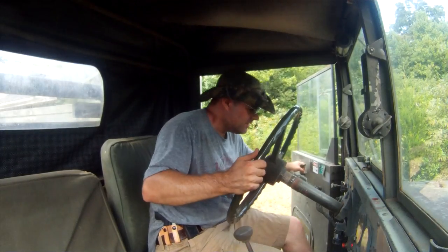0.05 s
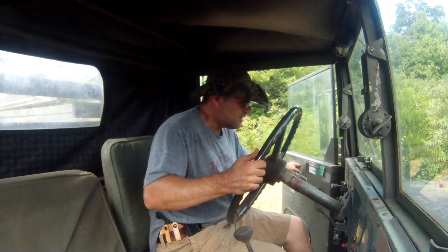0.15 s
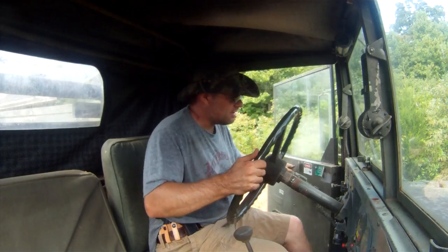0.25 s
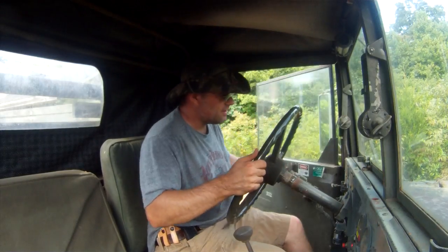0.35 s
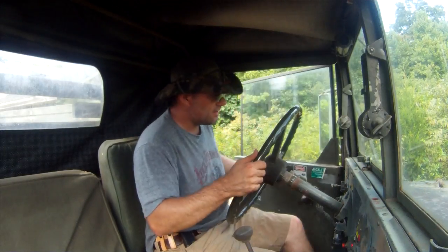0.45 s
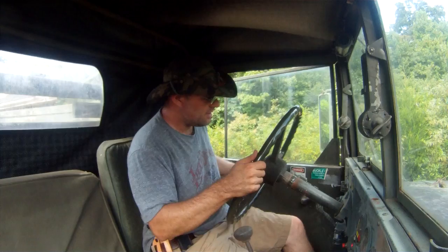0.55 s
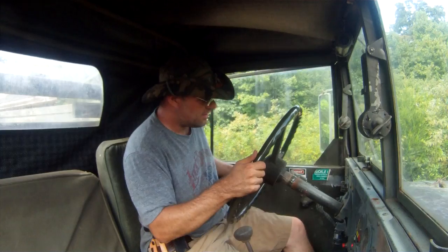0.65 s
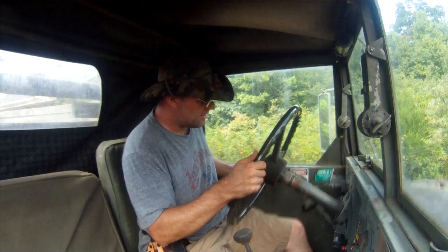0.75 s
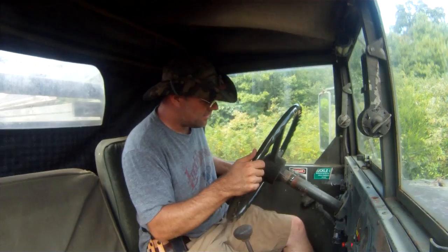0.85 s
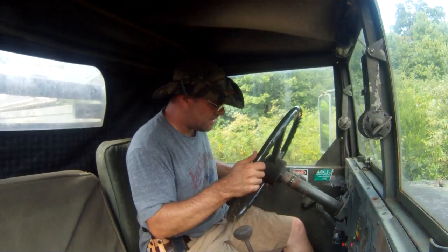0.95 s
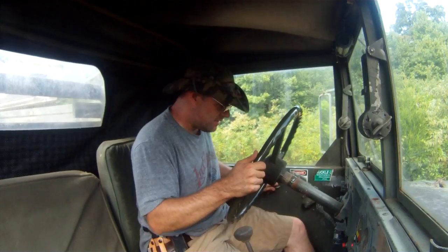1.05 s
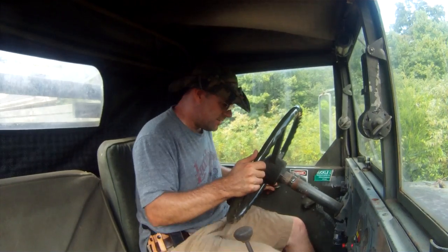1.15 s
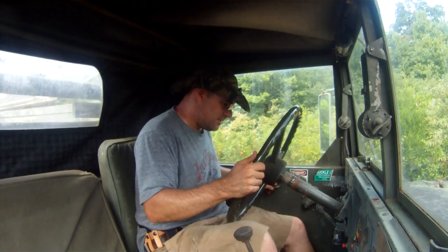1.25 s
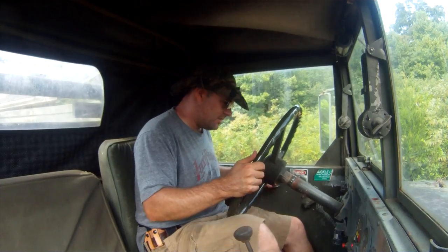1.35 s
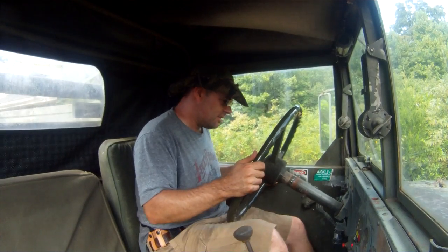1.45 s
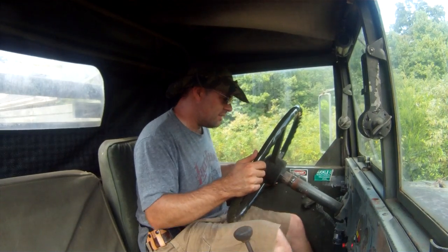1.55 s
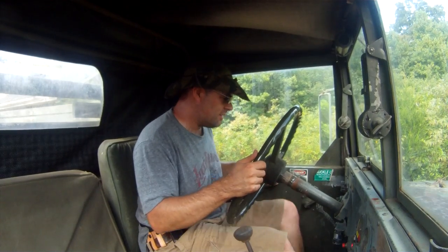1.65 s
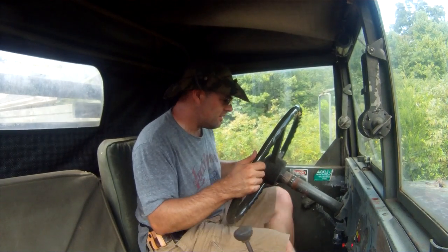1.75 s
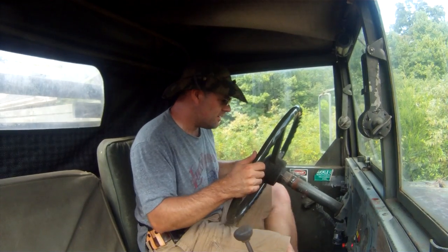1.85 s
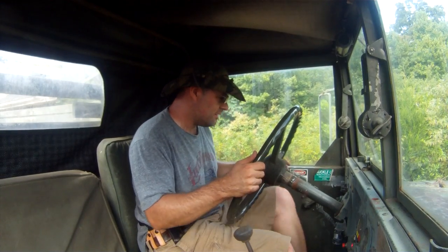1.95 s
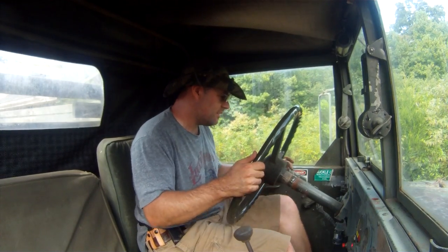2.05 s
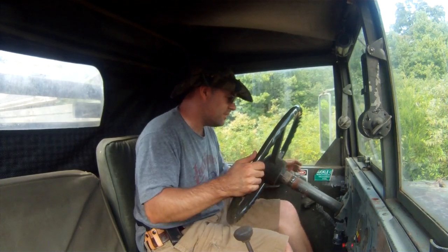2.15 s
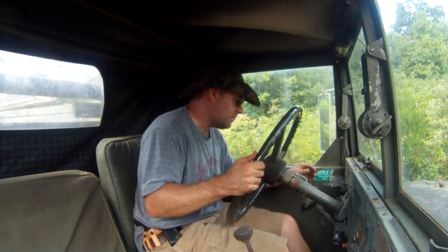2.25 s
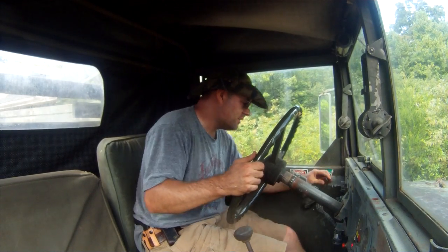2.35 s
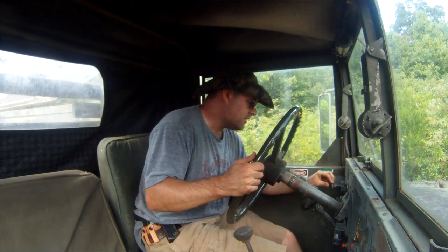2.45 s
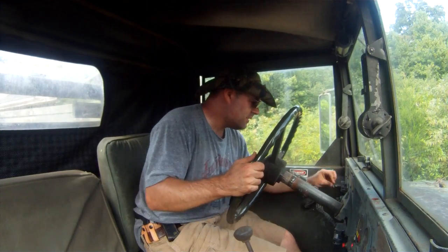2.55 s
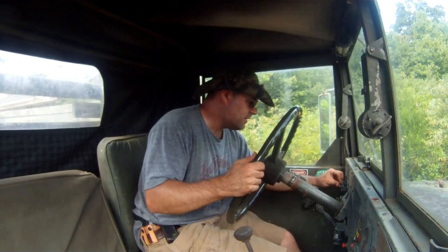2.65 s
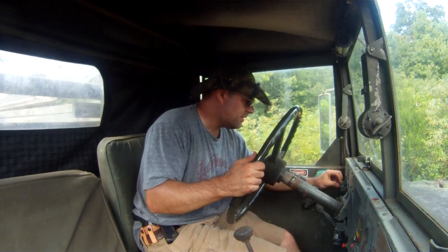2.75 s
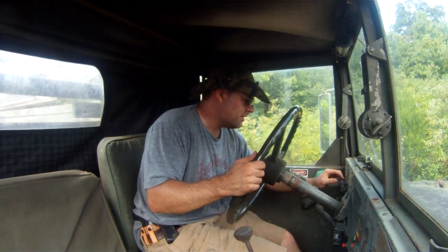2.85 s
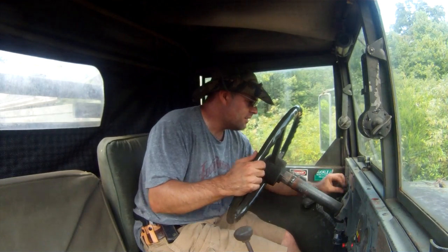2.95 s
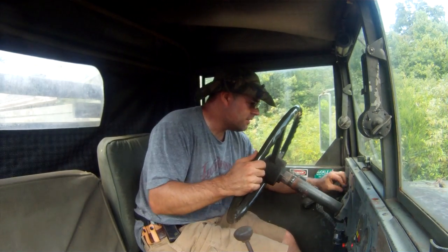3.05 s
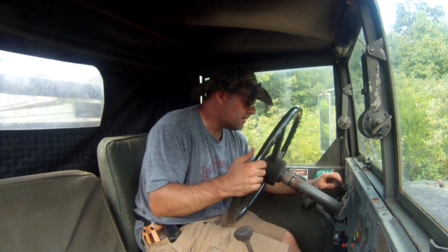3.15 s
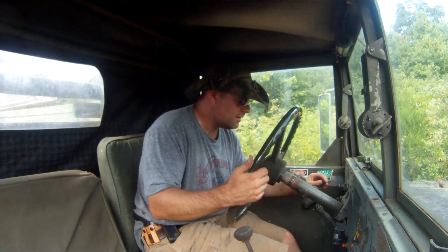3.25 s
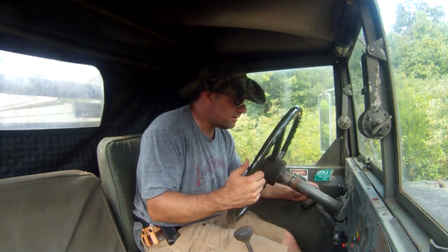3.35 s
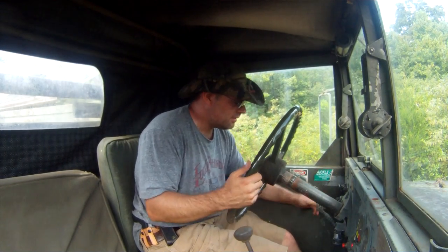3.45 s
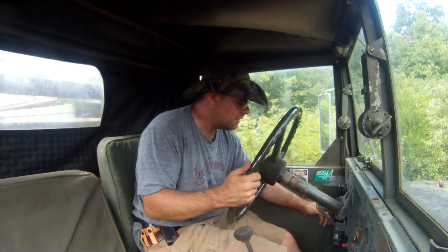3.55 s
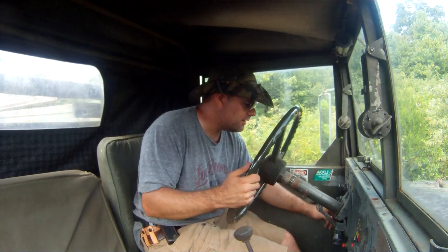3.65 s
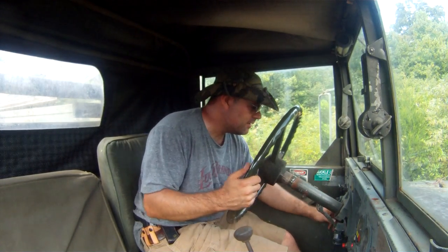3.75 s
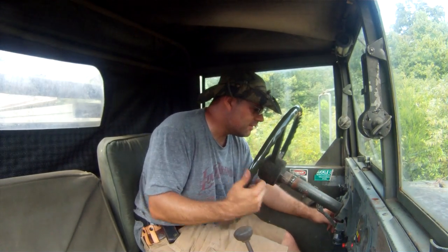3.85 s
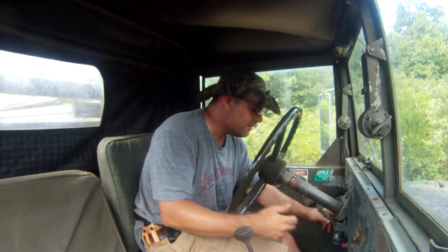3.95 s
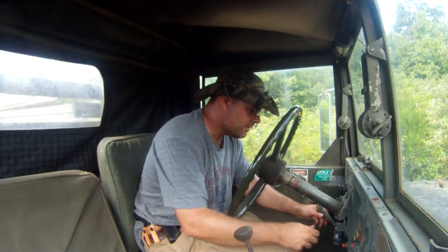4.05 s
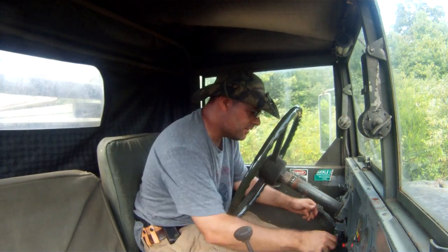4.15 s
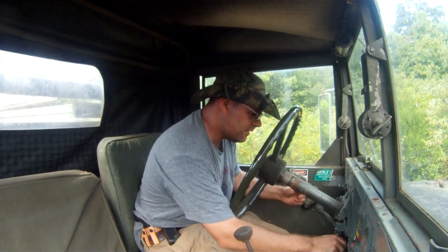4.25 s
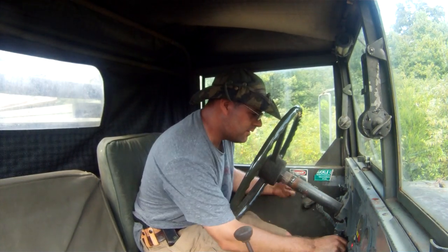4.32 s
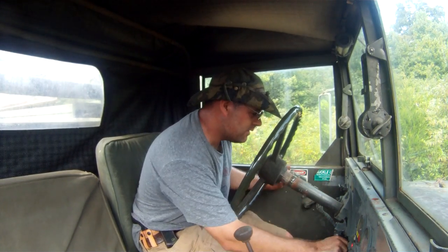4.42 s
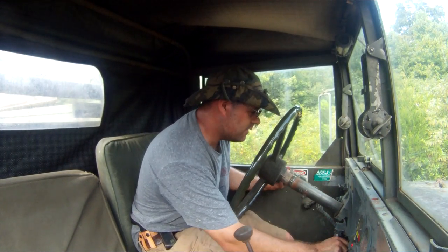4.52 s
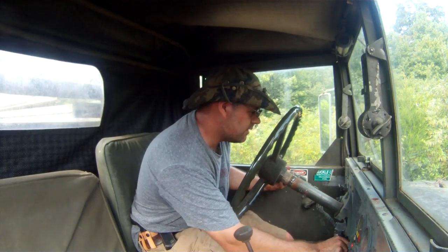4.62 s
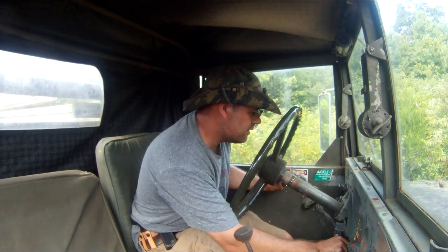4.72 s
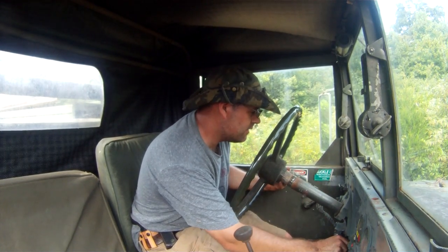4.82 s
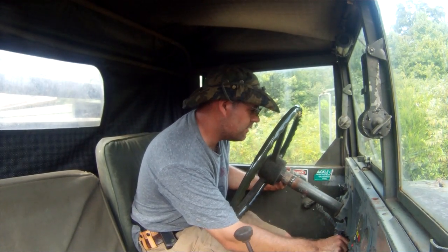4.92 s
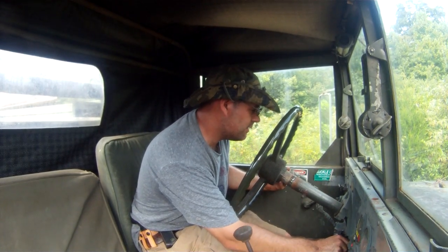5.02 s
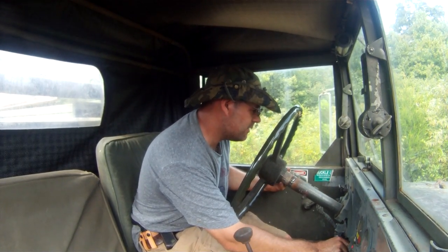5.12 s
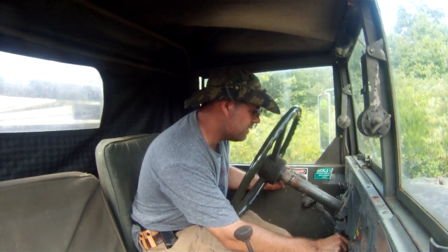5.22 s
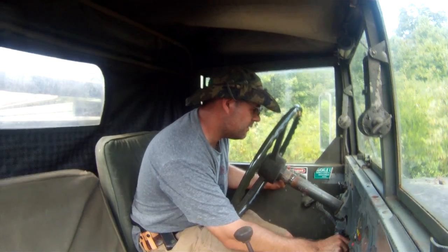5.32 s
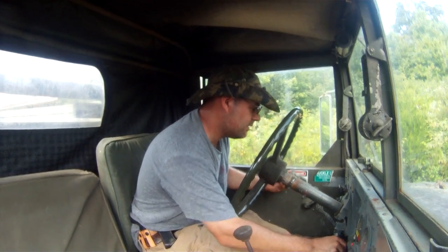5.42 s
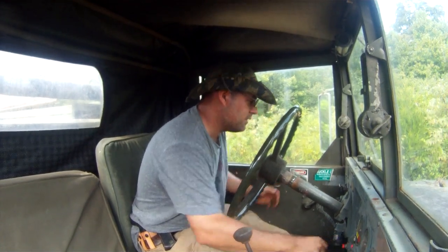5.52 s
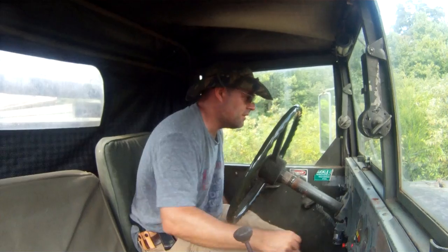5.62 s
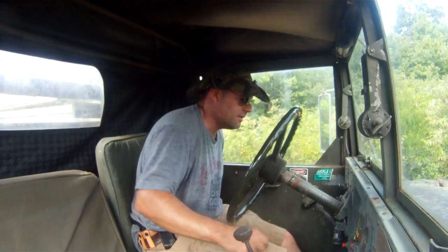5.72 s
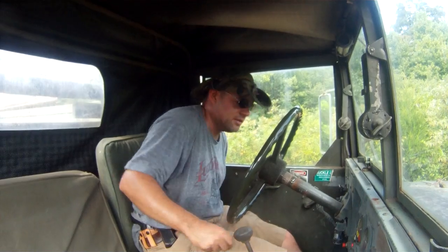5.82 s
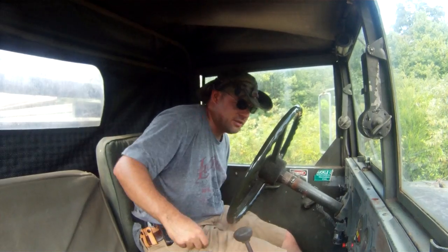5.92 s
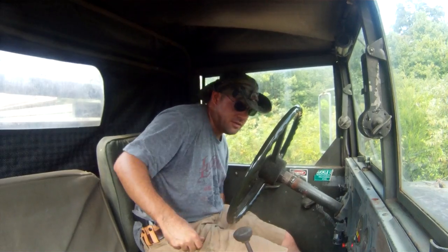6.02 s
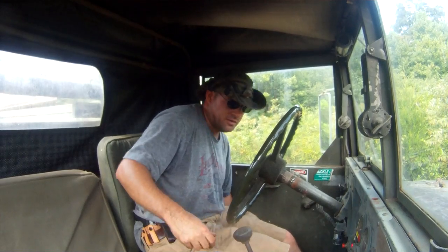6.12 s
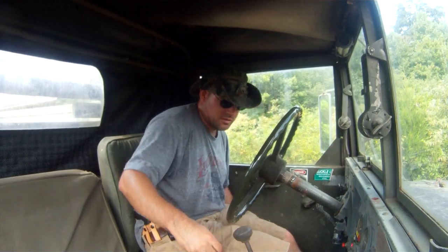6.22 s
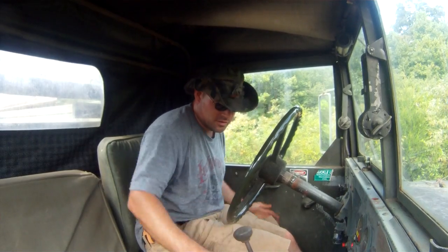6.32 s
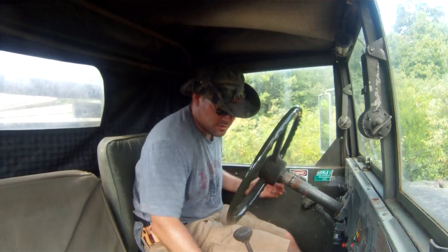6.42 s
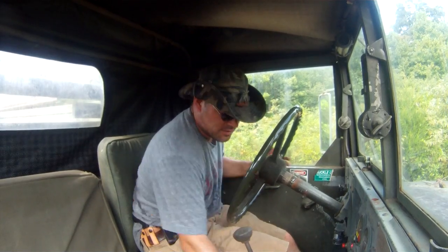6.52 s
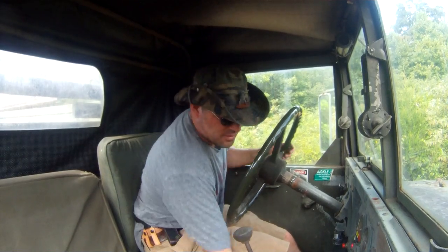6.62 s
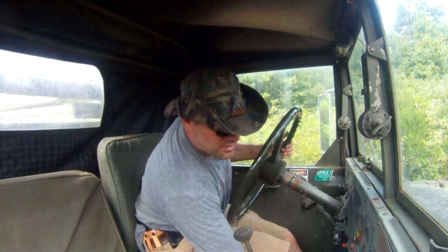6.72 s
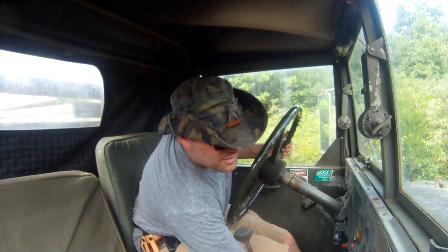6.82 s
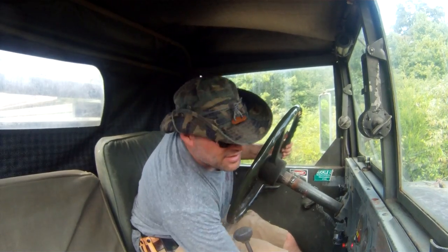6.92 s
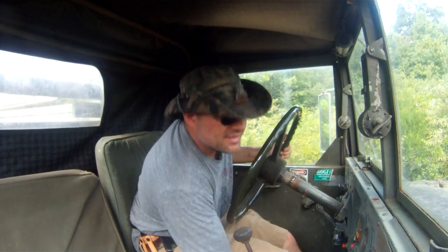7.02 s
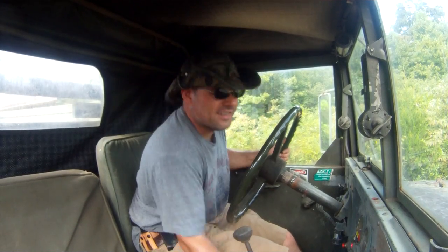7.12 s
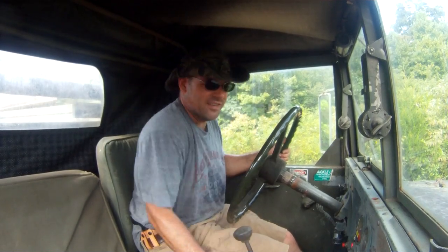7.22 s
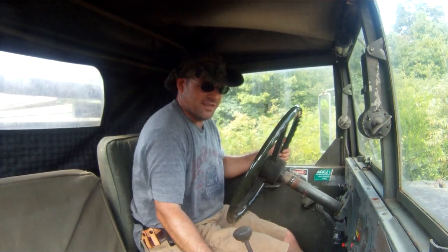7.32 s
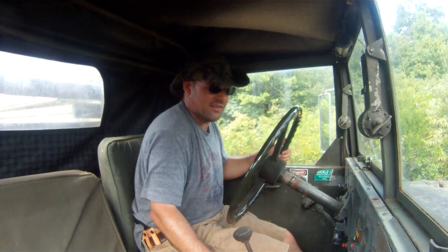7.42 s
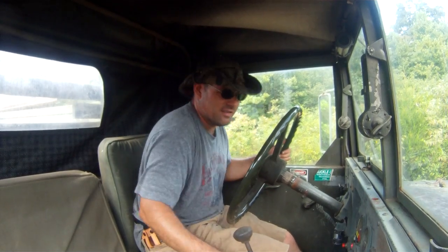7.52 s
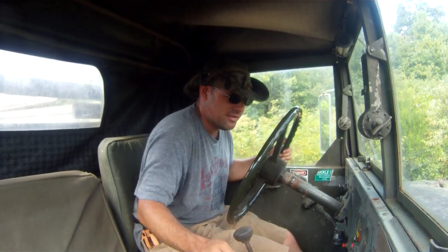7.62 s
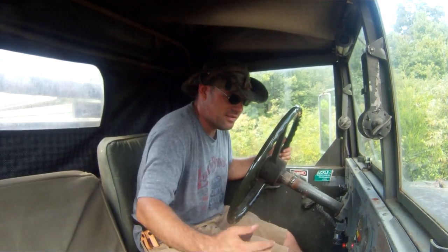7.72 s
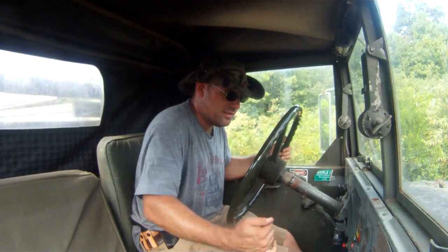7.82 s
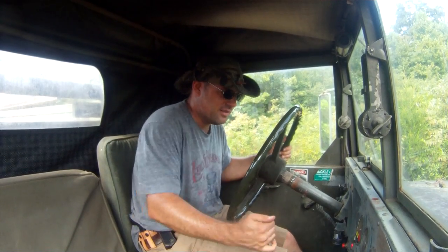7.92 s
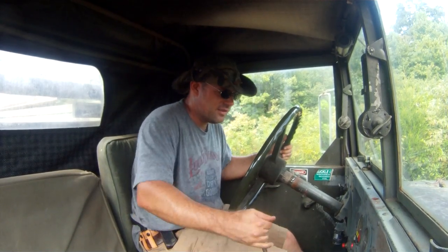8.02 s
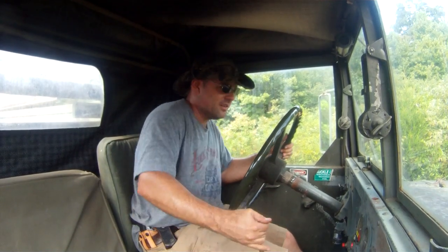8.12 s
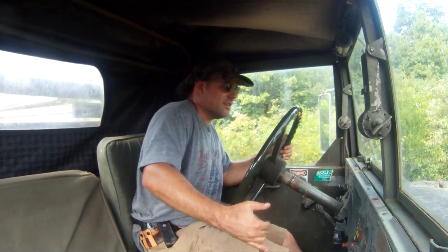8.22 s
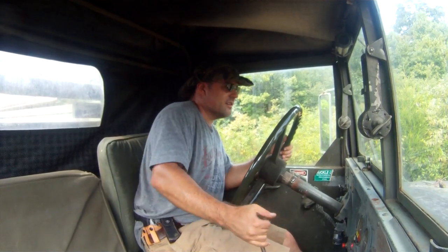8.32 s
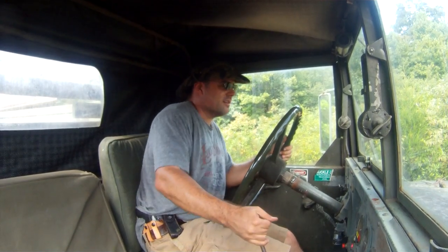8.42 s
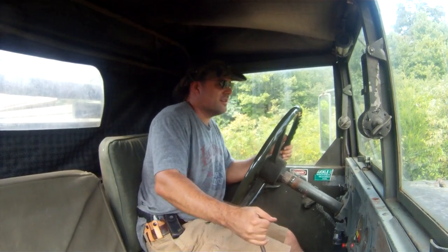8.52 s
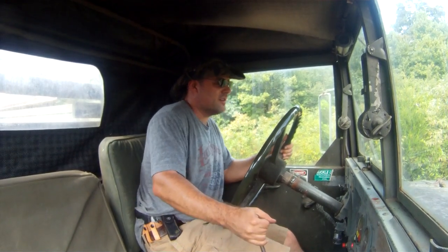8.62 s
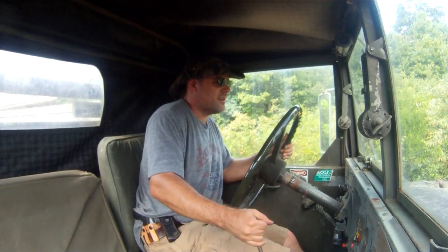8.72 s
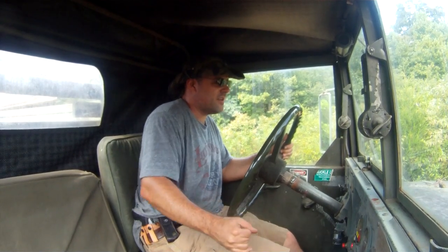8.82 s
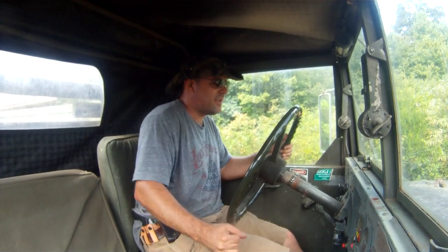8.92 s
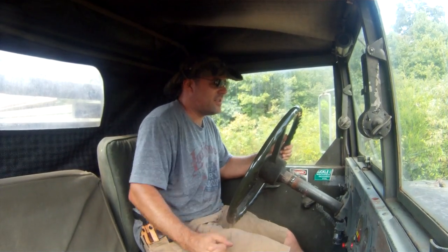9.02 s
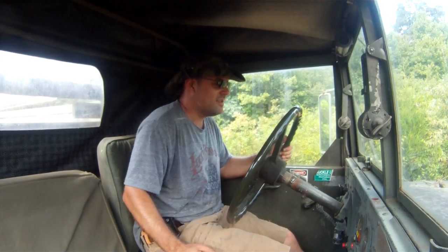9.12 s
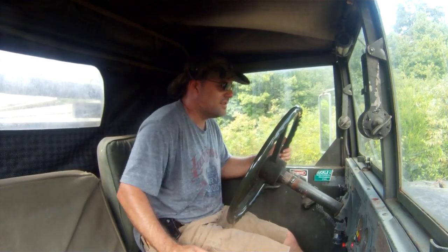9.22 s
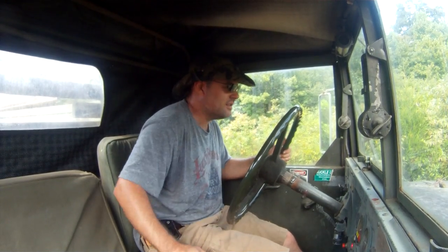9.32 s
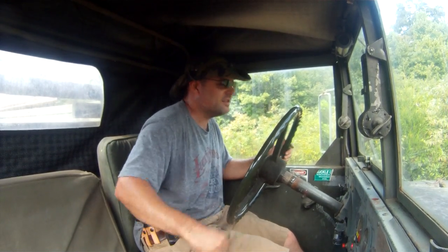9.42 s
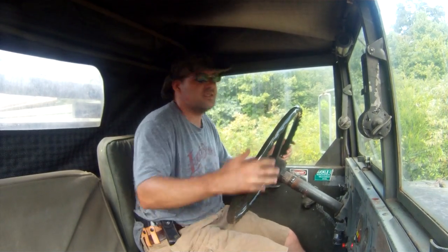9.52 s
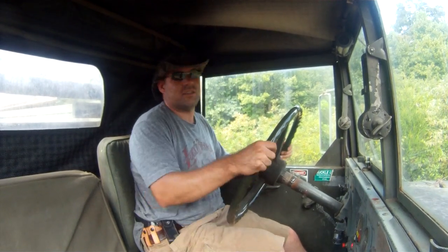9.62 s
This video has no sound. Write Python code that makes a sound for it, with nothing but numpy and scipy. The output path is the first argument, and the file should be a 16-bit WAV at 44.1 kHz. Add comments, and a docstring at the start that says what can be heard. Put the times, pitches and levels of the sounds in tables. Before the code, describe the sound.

Inside the steel cab of an old truck, the door slams and the cab booms low. Switches and levers click and knock at uneven intervals, with a faint seat rustle and one tiny squeak. About halfway through, the starter whirrs briefly and a large diesel engine catches. It settles into a steady, throbbing idle with a light knock and a thin whine, while two more sharp clacks come from the controls.

```python
"""A six-cylinder diesel is cranked, catches and idles, heard inside the steel cab of an old truck.
First the door slams, the seat creaks, switches and levers clack, and the cab booms on its springs.
The starter whirrs; then periodic firings throb, their impacts ring covers and sump, and a gear whines.
A small camera in a closed case hears it all; it holds each of its slow samples, so the spectrum is
mirrored around its sampling rate."""
import sys
import numpy as np
from scipy import signal
from scipy.fft import rfft, irfft, next_fast_len
from scipy.io import wavfile
from scipy.ndimage import map_coordinates

SR = 44100
rng = np.random.default_rng(int(sys.argv[2]) if len(sys.argv) > 2 else 0)


def file_out(sig):
    """Save sig as 16-bit WAV at sys.argv[1]."""
    # one column per channel
    cols = np.atleast_2d(sig).T
    # limit, then scale
    lim = np.clip(cols, -1, 1)
    pcm = np.round(lim * 32767).astype(np.int16)
    wavfile.write(sys.argv[1], SR, pcm)


N = 426202
T = np.arange(N) / SR
CYLINDERS = 6

# spectrum of steel striking steel: f/Hz, spectral level/dB
CLACK_SPECTRUM = [(290, -50.5), (500, -6), (849, -5.5), (933, -25.5), (1370, -5), (1510, -4.5),
                  (1650, -15.5), (2020, -0.5), (2560, -1), (3300, -24.5), (4290, -44), (7260, -120)]


def amp(db):
    """Amplitude ratio of a level in dB."""
    return 10 ** (np.asarray(db) / 20)


def unit(x):
    """Normalisation to rms 1."""
    return x / np.sqrt(np.mean(abs(x) ** 2) + 1e-20)


def curves(rows):
    """Linear interpolation: one value per sample for each column after the time."""
    times, *columns = np.transpose(rows)
    return [np.interp(T, times, column) for column in columns]


def wobble(rate):
    """Slow random modulation: a spline through rate knots a second."""
    return map_coordinates(rng.standard_normal(int(N * rate / SR) + 4), [T * rate])


def filtered(x, response):
    """Linear filtering: the spectrum of x times a frequency response."""
    size = next_fast_len(N + 8192)
    return irfft(rfft(x, size) * response(np.fft.rfftfreq(size, 1 / SR)), size)[..., :N]


def colour(points):
    """Broadband response of rms 1 through points of f/Hz, level/dB."""
    f, db = np.transpose(points)
    return lambda hz: unit(amp(np.interp(np.log(hz + 1), np.log(f + 1), db, left=-120, right=-120)))


def modes(rows, order=2):
    """Modal superposition, raised to order and scaled to rms 1; rows of f/Hz, bandwidth/Hz, level/dB."""
    def response(f):
        h = sum((-1) ** k * amp(db / order) * 1j * f * width / (f0 * f0 - f * f + 1j * f * width)
                for k, (f0, width, db) in enumerate(rows))
        return h ** order / np.sqrt(np.mean(abs(h) ** (2 * order)))
    return response


def decay(tau_s):
    """First-order response: each impulse leaves an exponential tail."""
    return lambda f: 1 / (1 + 2j * np.pi * f * tau_s)


def noise(grain_db=0, rate=200):
    """White noise of rms 1, amplitude-modulated into lumps."""
    return unit(rng.standard_normal(N) * amp(grain_db * wobble(rate)))


def hush():
    """Stationary noise of the air and the microphone sets the noise floor."""
    spectrum = [(15, -25.5), (25, 6), (56, -1), (214, -9.5), (363, -13.5), (388, -14.5), (628, -18),
                (1090, -21.5), (4090, -30.5), (5900, -37.5), (7670, -76), (13000, -120)]  # noise floor: f/Hz, spectral level/dB
    return amp(-56.5) * filtered(noise(), colour(spectrum))


def cab_boom():
    """Forced resonance: movements and the engine drive the low modes of the cab's air and floor."""
    cab_modes = [(46.5, 16.9, 0), (78.4, 26.5, -36)]  # air and floor: f/Hz, bandwidth/Hz, level/dB
    sway = [(0.0, -43), (0.4, -47), (0.77, -34), (0.92, -19), (1.04, -27), (1.5, -33.5), (2.14, -43.5),
            (2.63, -32), (3.29, -53), (4.36, -64), (4.8, -47.5)]  # rocking as the driver moves: t/s, level/dB
    # jolts of door, seat, controls, compression strokes and first firings: crest t/s, level/dB, T60/s
    jolts = [(.1, -42, 0.43), (.2, -33, 0.35), (.7, -32, 0.27), (.8, -18.5, 1), (.952, -12, 0.15),
             (1.08, -22, 0.7), (1.21, -19, 0.28), (1.4, -32.5, .3), (1.62, -28, 0.43), (2.0, -33.5, 0.15),
             (2.39, -33, 0.27), (2.531, -23.5, 0.51), (3.519, -44.5, .4), (4.59, -36.5, 0.31),
             (4.7, -40, 0.34), (4.9, -20.5, 0.97), (5.01, -22, 0.17), (5.16, -22, 0.22),
             (5.25, -17.5, 0.36), (5.33, -13.5, 0.36), (5.41, -16, 0.19), (5.54, -15.5, .4),
             (5.63, -17, 0.44), (5.71, -13.5, 0.24), (5.82, -16.5, 0.28), (5.99, -29, .2)]
    idle_start_s, tremble_db, rise_s = 6.2, -31, 0.075
    ring = signal.hilbert(filtered(noise(), modes(cab_modes)))
    steady = unit((ring / (abs(ring) + 0.017) ** 0.31).real)  # driven, it swings more evenly than noise
    calm_db = np.where(T < idle_start_s, curves(sway)[0], tremble_db) + 3 * wobble(11)
    power = amp(2 * calm_db)
    for crest_s, db, t60 in jolts:
        near = slice(max(round((crest_s - .2) * SR), 0), round((crest_s + 1) * SR))
        t = T[near] - crest_s
        below_crest_db = 60 * np.where(t < 0, (t / rise_s) ** 2, t / t60)
        power[near] += amp(2 * (db - below_crest_db))
    return np.sqrt(power) * steady


def rustle():
    """Friction noise: cloth and seat springs crackle faintly as the driver moves."""
    levels = [(0, -77), (.67, -66.5), (1.15, -59), (1.36, -72), (2.21, -67.5), (2.74, -64), (2.93, -95),
              (4.2, -85.5), (4.8, -69.5)]  # cloth and springs: t/s, level/dB
    envelope = amp(curves(levels)[0] + 1.3 * wobble(25)) * (T < 4.8)
    return envelope * filtered(noise(grain_db=4.7, rate=180), colour(CLACK_SPECTRUM))


def impacts():
    """Impact excitation: each contact is a short noisy clack with a thud and a ringing tail."""
    # seat, switches and levers: t/s, clack level/dB, thud and rasp re clack/dB, hold/s, T60/s
    controls = [(0.109, -61, 6, -8, .02, 0.078), (0.235, -60.5, -9, -10, 0.019, 0.51),
                (.6125, -59, -1, -10, .028, .17), (1.181, -42, 1, -9, 0.013, .12),
                (1.381, -62, -4, -8, 0.016, .12), (1.562, -56, 7, -8, .026, .15),
                (1.593, -48, 6, -4, 0.021, .16), (1.893, -60, -6, -5.5, 0.036, 0.33),
                (2.088, -55, -3, -15, 0.021, 0.11), (2.337, -51.5, -12, -6.5, 0.028, 0.094),
                (2.438, -45, -10, -17, 0.022, .16), (2.493, -44, 5.5, -13, 0.013, 0.26),
                (2.755, -46.5, -1, -12.5, 0.019, 0.17), (2.808, -30, -11.5, -13, .011, 0.098),
                (3.088, -59, -3.5, -12, .04, 0.24), (3.131, -37.5, -10.5, -10, 0.016, 0.083),
                (3.239, -72, -5.5, -11, 0.015, 0.085), (3.482, -63, -8, -11.5, .017, 0.1),
                (4.517, -65, -11, -2.5, 0.019, 0.1), (4.761, -47, -22, -11, .014, 0.11),
                (4.853, -37, 4.5, -7.5, 0.023, 0.13), (6.25, -40, -8, -2.5, .015, .1),
                (6.264, -28.5, -0.5, -7.5, 0.023, 0.12), (7.319, -40.5, 5, -2.5, .012, 0.075),
                (7.357, -29.5, -4.5, -5.5, 0.016, 0.19), (9.25, -50, -10, 4, .012, .06)]
    # seal, latch, rebound, window: t/s, clack level/dB, thud, panel and rasp re clack/dB, hold/s, T60/s
    door = [(.679, -67, 23.5, 5, -10, 0.018, 0.43), (.735, -52, 15, -1.5, -18.5, 0.0065, 0.052),
            (.8676, -19, -2.5, -11.5, -8, 0.055, 0.08), (.937, -38, 10, 5.5, -6, 0.013, 0.06),
            (1.0, -52, 12, 1.5, -11, 0.066, 0.59)]
    first_firings = [(5.2435, -37.5), (5.322, -36.5), (5.3873, -38), (5.479, -40), (5.556, -45.5)]  # the engine catches: t/s, clack level/dB
    thud_modes = [(109, 54, -5), (179, 50, -2.5), (259, 115, 0), (324, 60.5, 8.5), (396.5, 160, -6.5)]  # door skin and floor: f/Hz, bandwidth/Hz, level/dB
    panel_modes = [(952, 130, -3.5), (1191, 74, -0.5)]  # dash panel: f/Hz, bandwidth/Hz, level/dB
    plate_modes = [(1600, 60, -6), (2070, 35, 1), (2320, 14, 0), (2510, 45, 0), (2650, 50, 0),
                   (2830, 25, -3), (3230, 40, -7)]  # dash and latch plates: f/Hz, bandwidth/Hz, level/dB
    roof_modes = [(292.8, 10, 3), (393, 64, -10.5)]  # roof sheet: f/Hz, bandwidth/Hz, level/dB
    rasp_spectrum = [(1760, -49), (3000, 0), (3190, -12), (3850, -1), (4230, -11.5), (4950, -6),
                     (5900, -15), (7670, -58), (13000, -120)]  # treble of a contact: f/Hz, spectral level/dB
    t = np.arange(2 * SR) / SR
    envelopes = np.zeros((5, N + len(t)))  # thud, panel, clack, rasp, roof

    def strike(time_s, db, thud_db, rasp_db, hold_s, t60, panel_db=-12):
        shape = (1 - np.exp(-(t / 0.0015) ** 2)) * amp(-60 * np.clip(t - hold_s, 0, None) / t60)
        shape += amp(-23 - 60 * t / 0.5)  # a faint tail
        start = round((time_s - .003) * SR)
        span = slice(start, start + len(t))
        envelopes[:4, span] += np.outer(amp(db) * amp([thud_db, panel_db, 0, rasp_db]), shape)
        envelopes[4, span] += amp(db + thud_db - 30.5 - 60 * t / 3.18)  # thuds leave the roof drumming

    def clack(hz):
        return unit(colour(CLACK_SPECTRUM)(hz) + 1.3 * modes(plate_modes, order=1)(hz))

    for contact in controls:
        strike(*contact)
    for time_s, db, thud_db, panel_db, rasp_db, hold_s, t60 in door:
        strike(time_s, db, thud_db, rasp_db, hold_s, t60, panel_db)
    for time_s, db in first_firings:
        strike(time_s, db, thud_db=4, rasp_db=-7, hold_s=.018, t60=.07)
    paths = modes(thud_modes), modes(panel_modes), clack, colour(rasp_spectrum), modes(roof_modes)
    return sum(filtered(envelope[:N] * noise(grain_db=2.14, rate=300), path)
               for envelope, path in zip(envelopes, paths))


def lever_squeak():
    """Stick-slip friction: a stiff, dry lever gives a short, rising, unsteady tone."""
    glide = [(2.43, 740, -44), (2.442, 930, -42), (2.465, 990, -37.5), (2.5, 925, -46)]  # the lever slips: t/s, f/Hz, level/dB
    hz, db = curves(glide)
    slipping = np.interp(T, [2.43, 2.44, 2.485, 2.5], [0, 1, 1, 0])
    envelope = slipping * amp(db + 4.2 * wobble(150))
    return envelope * np.sin(2 * np.pi * np.cumsum(hz * (1 + 0.037 * wobble(120))) / SR)


def starter():
    """Structure-borne sound: pinion and brushes drive housing and floor; meshing teeth add a tone."""
    levels = [(4.76, -72, -72), (4.82, -53, -59), (4.9, -48, -38.5), (5.03, -44.5, -39.5),
              (5.1, -48.5, -42), (5.18, -43.5, -47), (5.3, -44, -40), (5.43, -46, -47), (5.62, -41, -39.5),
              (5.7, -38.5, -33), (5.86, -46, -37), (6.15, -48.5, -27)]  # cranking: t/s, whirr level/dB, groan level/dB
    housing_modes = [(597, 230, -6), (1126, 340, 1.5), (1580, 400, -1.5), (2030, 380, -1.5), (2524, 164, 2),
                     (2830, 120, -0.5), (3580, 910, -14.5), (5360, 550, -19.5)]  # starter housing: f/Hz, bandwidth/Hz, level/dB
    floor_modes = [(167.7, 21, 0.5), (285.6, 30, 3), (315.4, 38, -0.5), (387.5, 53, -2)]  # cab floor: f/Hz, bandwidth/Hz, level/dB
    mesh_hz = 2105
    whirr_db, groan_db = curves(levels)
    running = np.interp(T, [4.76, 4.78, 5.85, 6.15], [0, 1, 1, 0])
    meshed = np.interp(T, [4.88, 4.94, 5.22, 5.3], [0, 1, 1, 0])  # until the engine catches
    whirr = amp(whirr_db) * filtered(noise(grain_db=1.8, rate=60), modes(housing_modes))
    mesh_phase = 2 * np.pi * np.cumsum(mesh_hz * (1 + .02 * wobble(40))) / SR
    teeth = meshed * amp(whirr_db - 3.5 + 4.5 * wobble(25)) * np.sin(mesh_phase)
    groan = amp(groan_db) * filtered(noise(grain_db=2.2, rate=14), modes(floor_modes))
    return running * (whirr + teeth + groan)


def firing_throb(firings):
    """Harmonic series: periodic firings sound at multiples of the engine's cycle rate."""
    orders = [(3, -23), (6, 0.5), (7, -19.5), (8, -6), (9, -18.5), (10, -45), (12, -15), (18, -28),
              (24, -33), (42, -33.5), (46, -33), (57, -37), (60, -32.5)]  # engine orders: multiple of the cycle rate, level/dB
    cycles = (firings + 0.0022 * wobble(17)) / CYLINDERS  # each firing a little early or late
    throb = np.zeros(N)
    for order, db in orders:
        envelope = amp(db + (.4 + .04 * order) * wobble(7))
        throb += envelope * np.sin(2 * np.pi * order * cycles + rng.uniform(0, 2 * np.pi))
    return throb


def cycle_impulses(firings):
    """Periodic excitation: impulse trains on timing and valve covers repeat each cycle, with jitter."""
    # knocks of one cycle: position/firings, timing cover level/dB, valve cover level/dB
    pattern = [(0, 0, -4), (.95, -2, -8), (2, -2, -2), (3, -12, -12), (4.1, -8, -4), (5.1, -6, 0)]
    position, blow_db, tap_db = np.transpose(pattern)
    times = np.interp(CYLINDERS * np.arange(-20, 12)[:, None] + position, firings, T, right=0)
    times += .00012 * rng.standard_normal(times.shape)
    samples = (abs(times.ravel()) * SR).astype(int)

    def train(db, spread_db):
        strengths = amp(db + spread_db * rng.standard_normal(times.shape))
        return np.bincount(samples, strengths.ravel(), N)[:N] * (T >= 1)
    return train(blow_db, spread_db=1.5), train(tap_db, spread_db=2)


def diesel_knock(blows, rattle):
    """Free vibration: each blow rings timing cover and sump, and its dying rattle stirs the cover."""
    cover_modes = [(1035, 85, 0), (1110, 70, -4), (1480, 80, -13)]  # timing cover: f/Hz, bandwidth/Hz, level/dB
    sump_modes = [(269, 31.5, 0.5), (304, 33, 1.5), (381, 40, -3), (175, 11, 0)]  # sump: f/Hz, bandwidth/Hz, level/dB
    cover = unit(filtered(blows, modes(cover_modes)))
    sump = unit(filtered(blows, modes(sump_modes)))
    clatter = filtered(unit(rattle * noise()), modes(cover_modes))
    return cover + amp(-1) * sump + amp(-11) * clatter


def engine_rush(taps, rattle):
    """Amplitude modulation: block noise pulses with the blows, tappet noise with the seating valves."""
    block_spectrum = [(60, -50), (90, -9.5), (216, -19.5), (270, -14.5), (371, -12), (475, -22), (876, -22),
                      (1050, -9), (1260, -27.5), (1790, -23.5), (2640, -21.5), (3310, -35.5), (5310, -40.5),
                      (5900, -47.5)]  # engine noise through the firewall: f/Hz, spectral level/dB
    valve_cover_modes = [(1491, 69, 6.5), (2088, 126, 8), (2307, 240, -11.5), (2633, 370, 4.5),
                         (3680, 223, -9)]  # valve cover: f/Hz, bandwidth/Hz, level/dB
    ticks = unit(filtered(taps, decay(tau_s=0.006)))
    block = filtered(unit((1 + 0.096 * rattle) * noise()), colour(block_spectrum))
    tappets = filtered(unit((1 + .6 * ticks) * noise()), modes(valve_cover_modes))
    return amp(4.5) * block + amp(-5) * tappets


def gear_whine(firings):
    """Gear-mesh tone, amplitude-modulated once a cycle, over a fainter steady tone."""
    mesh_tone = [(5.8, 960, -58), (6.2, 964, -48), (7.2, 964, -43), (8.55, 965, -43), (8.8, 974, -42),
                 (9.66, 974, -40.5)]  # the gear: t/s, f/Hz, level/dB
    swell_db, crest_firings, faint_hz = 3.5, 4.35, 836
    hz, db = curves(mesh_tone)
    db += swell_db * np.cos(2 * np.pi * (firings - crest_firings) / CYLINDERS)
    whine = amp(db + 1.6 * wobble(14)) * np.sin(2 * np.pi * (np.cumsum(hz) / SR + .04 * wobble(20)))
    faint = amp(-55.5 + 2 * wobble(6)) * np.sin(2 * np.pi * (faint_hz * T + .1 * wobble(12)))
    return whine + (T > 6) * faint


def engine():
    """Synchronous sources: one firing rate paces the diesel's throb, knock, rush and whine."""
    levels = [(5.2, -22, -52, -60), (5.3, -17, -47.5, -70), (5.66, -15.5, -47, -56),
              (6.04, -18, -43.5, -58), (6.14, -14, -44, -53.5), (7.2, -14, -42.5, -51.5),
              (7.55, -15, -43, -49), (9.66, -16, -43, -47)]  # catching and idling: t/s, throb, rush and knock level/dB
    firing_rate = [(5.2, 11), (5.7, 32), (5.85, 36), (6, 37.9), (6.5, 37.72), (7, 37.82), (8.5, 37.84),
                   (9.66, 37.92)]  # run-up to idle: t/s, firing f/Hz
    cycle_start_s = 8.013  # firings are counted from this knock
    throb_db, rush_db, knock_db = curves(levels)
    firings = np.cumsum(curves(firing_rate)[0]) / SR
    firings -= firings[round(cycle_start_s * SR)]
    throb = firing_throb(firings)
    blows, taps = cycle_impulses(firings)
    rattle = unit(filtered(blows, decay(tau_s=0.043)))
    knock = amp(knock_db) * diesel_knock(blows, rattle)
    rush = amp(rush_db) * engine_rush(taps, rattle)
    whine = gear_whine(firings)
    running = np.interp(T, [5.2, 5.3], [0, 1])
    return running * (amp(throb_db + 0.67 * wobble(4.2)) * throb + knock + rush + whine)


def scene():
    """Superposition: all sources add at one microphone."""
    return (hush() + cab_boom() + impacts() + lever_squeak() + rustle() + starter() + engine())[None]


def record(dry):
    """Zero-order hold: spectral images flank the sampling rate and droop as sin(x) / x."""
    sample_hz, band_limit_hz = 12000, 15500

    def baseband(hz):
        low_pass = np.clip((sample_hz / 2 - hz) / 300, 0, 1)
        return low_pass / np.sinc(np.minimum(hz / sample_hz, .5))  # only the images keep the droop

    mirrored = filtered(dry, baseband) * (1 + 2 * np.cos(2 * np.pi * sample_hz * T))
    return filtered(mirrored, lambda hz: abs(np.sinc(hz / sample_hz)) * (hz < band_limit_hz))


dry = scene()
out = record(dry)
file_out(out)
```